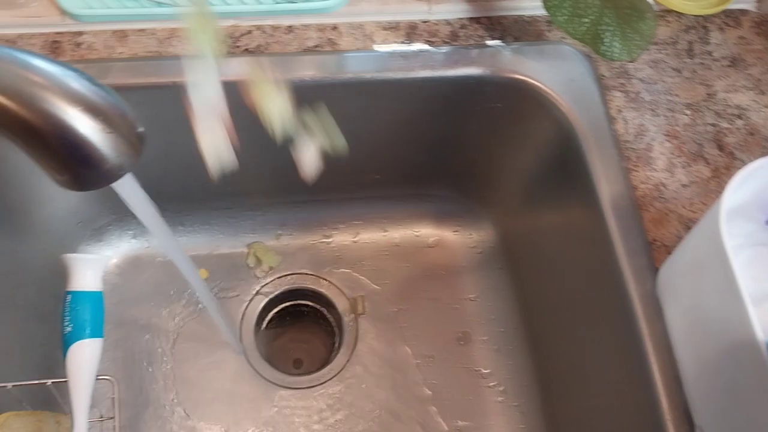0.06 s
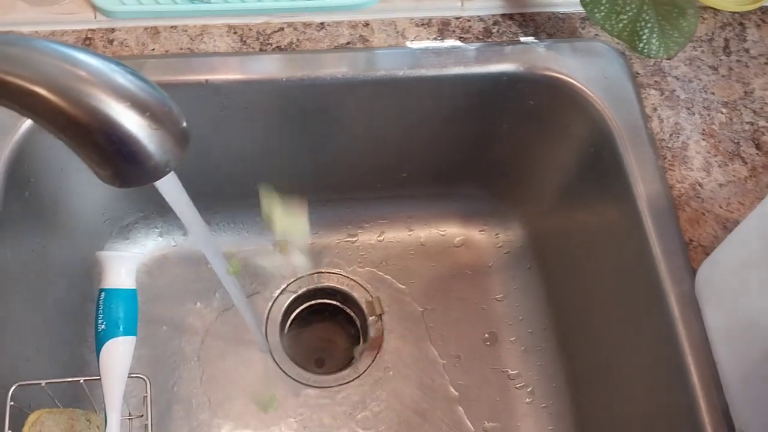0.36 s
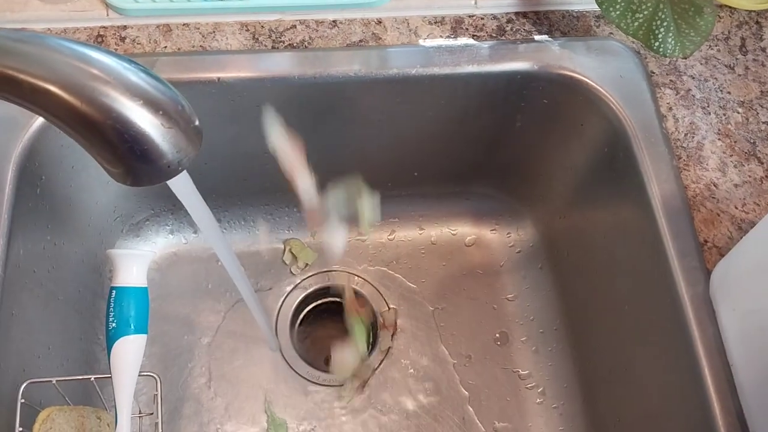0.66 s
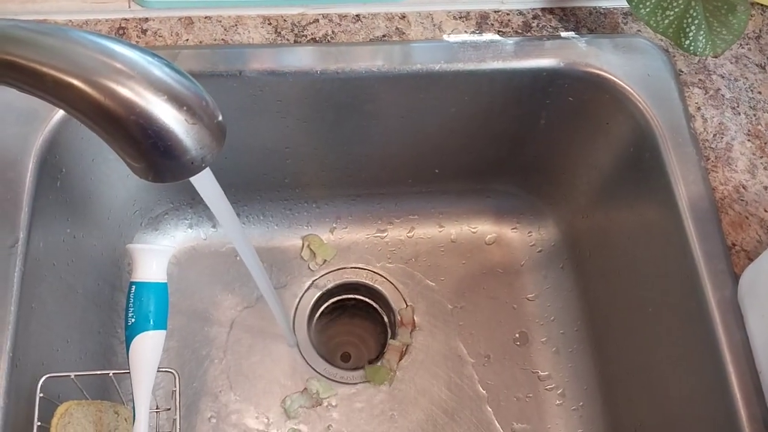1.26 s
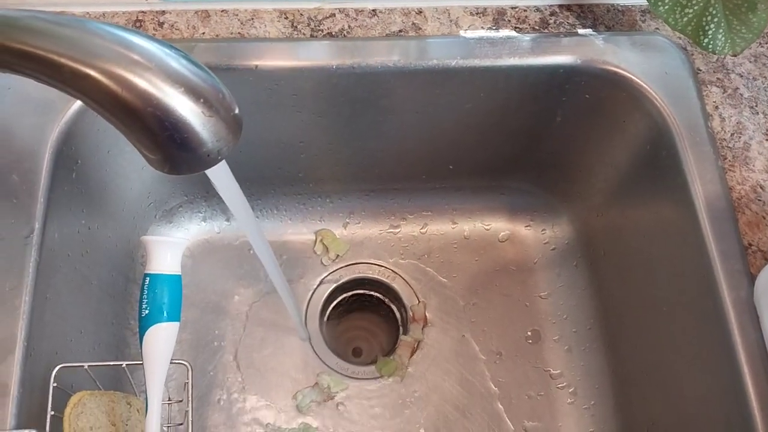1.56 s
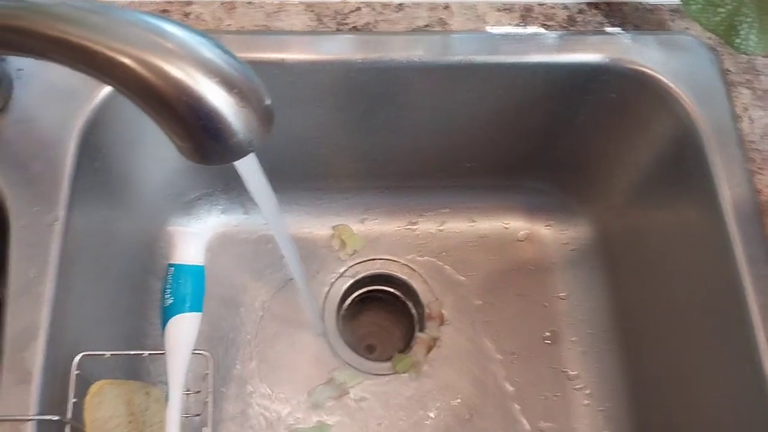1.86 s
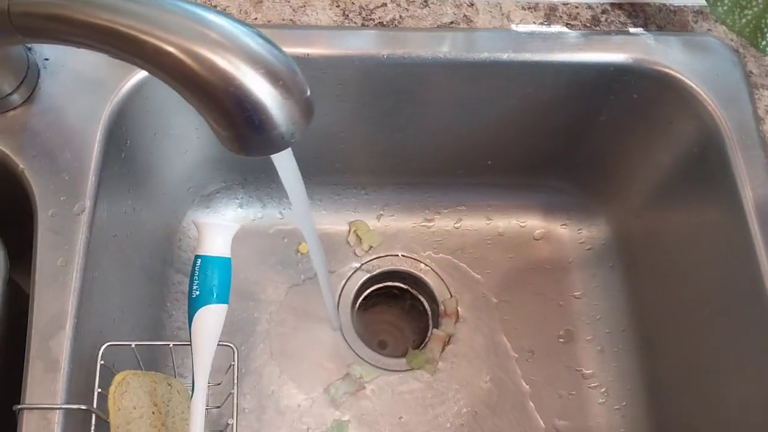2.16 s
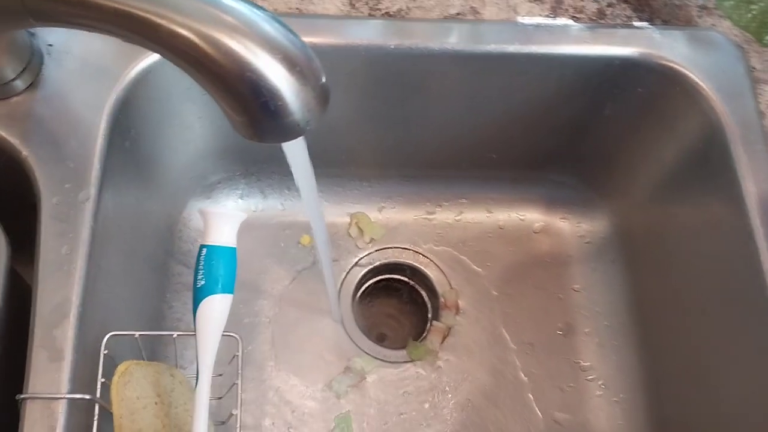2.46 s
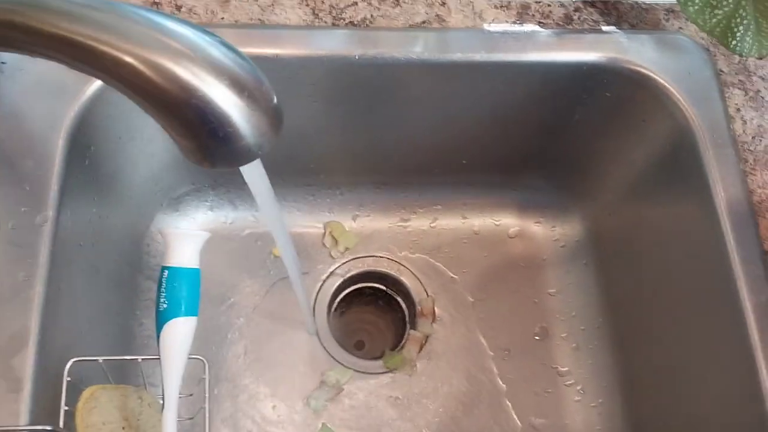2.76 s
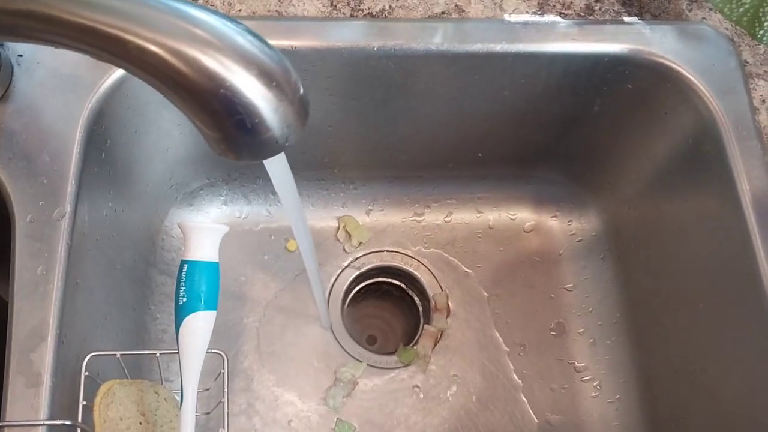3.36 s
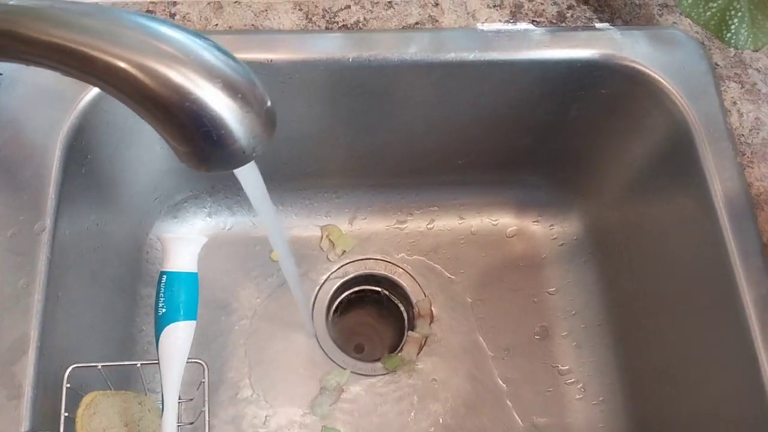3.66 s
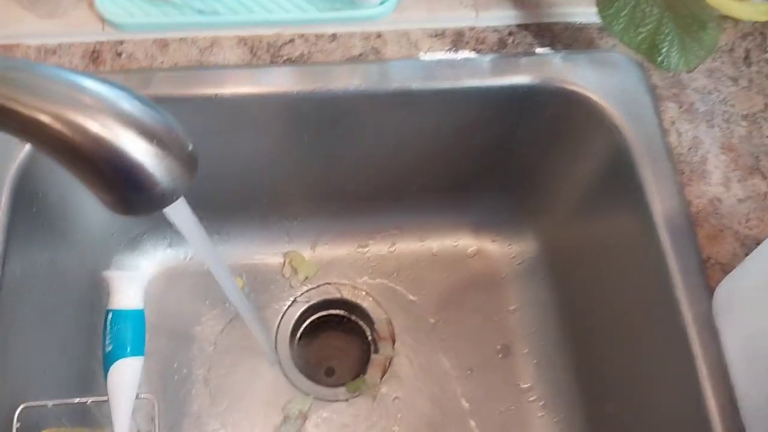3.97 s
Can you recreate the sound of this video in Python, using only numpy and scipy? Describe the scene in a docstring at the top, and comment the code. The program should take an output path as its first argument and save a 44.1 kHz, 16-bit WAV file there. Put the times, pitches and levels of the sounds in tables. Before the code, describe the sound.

A garbage disposal runs in a steel kitchen sink, its motor humming and whining while food scraps rattle and crunch inside. Tap water splashes into the basin throughout, over a low churning rumble.

```python
"""At a steel kitchen sink, a garbage disposal runs while the tap pours into the basin.
The splashing tap makes a hiss, and water churning in the disposal's chamber makes a low rumble.
The motor hums and whines at multiples of its shaft speed. Food scraps rattle against the
grind ring, hardest twice a turn, and make the sink ring."""
import sys
import numpy as np
from scipy import signal
from scipy.fft import rfft, irfft, next_fast_len
from scipy.io import wavfile
from scipy.ndimage import uniform_filter1d, map_coordinates

SR = 44100
rng = np.random.default_rng(int(sys.argv[2]) if len(sys.argv) > 2 else 0)


def file_out(sig):
    """Save sig as 16-bit WAV at sys.argv[1]."""
    # one column per channel
    cols = np.atleast_2d(sig).T
    # limit, then scale
    lim = np.clip(cols, -1, 1)
    pcm = np.round(lim * 32767).astype(np.int16)
    wavfile.write(sys.argv[1], SR, pcm)


N = 176400  # 4 seconds

# how alike left and right sound (1 same, 0 unrelated, -1 opposite): pitch_hz, likeness
STEREO_LIKENESS = [(60, .98), (450, .975), (650, .5), (900, .6), (1300, .15), (1550, .7), (1850, .25),
                   (2100, .7), (2400, .35), (2650, -.35), (3000, .3), (3350, -.45), (3680, -.7),
                   (3950, .15), (4300, -.2), (5000, 0)]
# pitches at which the steel sink rings: pitch_hz, width_hz, level_db
SINK_RINGS = [(878, 50, -4), (1087, 19.5, 6), (1190, 16, 3), (1397, 33, 6), (1550, 89, -8.5),
              (1682, 25, -1.5), (1956, 43, -4.5), (2207, 50, 1), (2437, 74, 3.5), (2950, 310, 0),
              (3950, 260, -4.5), (5060, 330, -3)]
# how the basin colours rattle and splash on each side: pitch_hz, left_db, right_db
BASIN_COLOUR = [(580, -33, -13), (630, -25, -25), (790, -17.5, -24.5), (837, -15, -12.5), (1094, -13, -13),
                (1160, -18.5, -14), (1377, -16.3, -11), (1800, -8, -7.5), (1910, -9.5, -9),
                (2250, -15, -4.5), (2240, -20.5, -3.5), (2760, -11, -11.5), (3190, -20, -8.5),
                (3340, -6, -5), (3980, -16.5, -7), (4430, -8.5, -10.5), (4500, -17.5, -11),
                (4730, -13, -11.5), (5600, -13.5, -10.5), (7620, -14, -10.5), (8500, -20.5, -21),
                (9550, -18.5, -14.5), (10640, -16.5, -9.5), (12900, -11.5, -8.5), (14200, -14.5, -13.5),
                (16100, -17, -13)]
# strength of the tap stream on the steel: time_s, level_db
TAP_FLOW = [(0, -21), (.3, -21.5), (1.1, -21.5), (2.1, -21), (3.5, -20.5), (4, -21)]
# balance of low and high in the splash: pitch_hz, gain_db
TAP_COLOUR = [(300, -49), (700, -10.5), (2000, -8.5), (4000, -5.5), (6000, 0), (9000, 1), (15000, -2.5)]
# spurts of spray: start_s, level_db
TAP_SPURTS = [(.079, -15.5), (.345, -17), (.62, -18), (.743, -20), (.878, -21), (1.071, -20), (1.44, -16),
              (1.859, -17)]
# balance of low and high in the churning water: pitch_hz, gain_db
CHURN_COLOUR = [(20, -35), (36, -33), (52, -17), (66, -21), (110, -18.5), (148, -3.5), (172, -16.5),
                (215, -0.5), (240, 0.5), (258, -3), (275, -3), (300, -2.5), (350, -1), (400, 1.5),
                (435, -4.5), (470, -8.5), (505, -22.5), (620, -32.5), (900, -70)]
# gulps of the churning water: peak_s, level_db
CHURN_GULPS = [(.27, -21.5), (.335, -21), (1.705, -22), (2.15, -25), (2.612, -21)]
# shaft speed under a changing load: time_s, turns_per_s
SHAFT_SPEED = [(0, 67.85), (0.2, 67.61), (0.35, 68.06), (0.55, 67.68), (0.88, 67.95), (1.1, 67.26),
               (1.35, 67.22), (1.65, 67.51), (2, 67.53), (2.2, 67.27), (2.4, 67.74), (2.75, 67.95),
               (2.95, 67.79), (3.25, 68.09), (3.5, 68.15), (4, 67.28)]
# tones in the motor's hum: cycles_per_turn, level_db, roughness
HUM_TONES = [(1, -38, 0), (2, -34, 0), (3, -38, 0.53), (4, -38.5, 1), (5, -39.5, 0), (8, -53, .6),
             (16, -61, 1), (18, -58, 0.5), (23, -47, 0)]
# buzz of the mains electricity: pitch_hz, level_db
MAINS_TONES = [(120, -42.5), (240, -41.5)]
# drone of the chamber: time_s, level_db
DRONE_LEVEL = [(0, -32), (.55, -25), (.73, -25.5), (.82, -25), (1.3, -26), (1.75, -25.5), (2.05, -30.5),
               (2.17, -27.5), (2.33, -33.5), (2.4, -28.5), (3.05, -31.5), (3.3, -25.5), (3.42, -32),
               (3.62, -26.5), (4, -29.5)]
# whine of the grind plate: time_s, level_db
WHINE_LEVEL = [(0, -35), (.9, -34.5), (1.2, -32), (2.6, -30.5), (3.25, -34), (3.7, -36), (4, -46)]
# scraps that scrape and ring: peak_s, pitch_hz, level_db, width_s
RING_SCRAPES = [(0.455, 2920, -31, 0.055), (0.619, 2960, -29, 0.017), (1.606, 3900, -31.5, 0.086),
                (2.137, 2420, -24, .007), (2.223, 2350, -29.5, 0.016), (3.234, 2060, -31, 0.012)]
# how hard the steady grinding works: time_s, level_db
GRIND_EFFORT = [(0, -20.5), (.25, -24), (1.1, -24), (2.2, -23), (3.2, -24), (4, -24.5)]
# balance of low and high in the rattle: pitch_hz, gain_db
GRIND_COLOUR = [(300, -36), (550, -1.5), (900, -1.5), (4000, 1), (6000, -3), (9000, -8.5), (15000, -35)]
# how much the rattle's treble gains and its middle loses: time_s, shift_db
GRIND_BRIGHTNESS = [(0, 4.5), (.7, 3), (1.4, 1.3), (2, 1), (3, 1), (4, 0)]
# larger scraps caught by the plate: start_s, level_db
BIG_CRUNCHES = [(.053, -20), (.148, -19.5), (.456, -18.5), (.495, -19), (.553, -27), (.746, -16),
                (.967, -15.5), (1.056, -19.5), (1.071, -14), (1.232, -31), (1.53, -22), (1.66, -15.5),
                (1.76, -21), (1.94, -21), (2.138, -23), (2.316, -15), (2.377, -21), (2.525, -21),
                (2.789, -16), (2.963, -14.5), (3.216, -29), (3.23, -14), (3.252, -20), (3.495, -19),
                (3.612, -18), (3.828, -16.5)]
# lulls when the plate runs free: middle_s
GRIND_LULLS = [.72, .785, 1.495, 3.29, 3.655]

CRUNCH_FADE_S = .075  # time for a crunch or a bite to fall by 60 dB


def amp(db):
    """Turn decibels into a number to multiply by."""
    return 10 ** (np.asarray(db) / 20)


def unit(x):
    """Scale a signal to an average strength (rms) of 1."""
    return x / np.sqrt(np.mean(x ** 2) + 1e-20)


def along(points, hz):
    """Read between (pitch_hz, value) points, with octaves about evenly spaced."""
    pitches, values = np.transpose(points)
    return np.interp(np.log(hz + 1), np.log(pitches + 1), values)


def curve(rows):
    """Join (time_s, value) points with straight lines, one value per sample."""
    return np.interp(np.arange(N) / SR, *np.transpose(rows))


def wobble(rate):
    """A smooth curve through `rate` random values a second."""
    return map_coordinates(rng.standard_normal(2048), [np.arange(N) * rate / SR], mode="wrap")


def filtered(x, response):
    """Turn each pitch in x up or down by the gain response(hz)."""
    size = next_fast_len(N + SR // 2)
    return irfft(rfft(x, size) * response(np.fft.rfftfreq(size, 1 / SR)), size)[..., :N]


def spread(pair):
    """Mix two unrelated signals into a left and a right that are partly alike."""
    angle = lambda hz: np.arccos(np.clip(along(STEREO_LIKENESS, hz), -1, 1)) / 2
    mid, side = filtered(pair, lambda hz: np.array([np.cos(angle(hz)), np.sin(angle(hz))]))
    return np.array([mid + side, mid - side])


def tone(cycles, rough, rate):
    """A tone that flutters in strength and pitch; rough = 0 keeps it pure."""
    flutter = 1 + rough * (wobble(rate) + 1j * wobble(rate))
    return unit((flutter * np.exp(2j * np.pi * cycles)).real)


def impacts(per_s, spread_db):
    """Two unrelated showers of tiny blows of uneven size."""
    hit = rng.random((2, N)) < per_s / SR
    sign, size = rng.standard_normal((2, 2, N))
    return unit(hit * np.sign(sign) * amp(spread_db * size))


def bursts(rows, fade_s, rise_s):
    """Power over time of events that rise fast, then fall by 60 dB in fade_s."""
    t, power = np.arange(SR // 4) / SR, np.zeros(N + SR)
    shape = (1 - np.exp(-t / rise_s)) * np.exp(-np.log(1000) * t / fade_s)
    for start_s, db in rows:
        power[round(start_s * SR):][:len(t)] += (amp(db) * shape) ** 2
    return power[:N]


def basin(blows, colour):
    """Blows ring the steel sink, which changes their tone but keeps their overall level."""
    def response(hz):
        rings = sum(amp(db) * 1j * hz * width / (pitch * pitch - hz * hz + 1j * hz * width)
                    for pitch, width, db in SINK_RINGS)
        left_db = along([(pitch, db) for pitch, db, _ in BASIN_COLOUR], hz)
        right_db = along([(pitch, db) for pitch, _, db in BASIN_COLOUR], hz)
        return (1 + amp(-1) * rings) * amp([left_db, right_db]) * amp(along(colour, hz))
    return unit(filtered(spread(blows), response)) * np.std(blows)


def patchy(x, depth_db):
    """Different scraps and drops favour different pitches, so the tone keeps shifting."""
    spectrum = signal.stft(x, nperseg=512)[2]
    patches = uniform_filter1d(rng.standard_normal(spectrum.shape[1:]), size=4, axis=0)  # over pitch
    patches = uniform_filter1d(patches, size=14, axis=1)  # over time
    shifted = signal.istft(spectrum * amp(depth_db * unit(patches)), nperseg=512)[1]
    return unit(shifted[:, :N]) * np.std(x)


def tap(turns):
    """The stream breaks into tiny drops on steel shaken by the motor, now and then with a spurt."""
    shake_db = 0.28 * (np.cos(2 * np.pi * turns) + np.cos(4 * np.pi * turns))
    flow = amp(curve(TAP_FLOW) + 0.5 * wobble(55) + 0.92 * wobble(300) + shake_db)
    force = np.sqrt(flow ** 2 + bursts(TAP_SPURTS, fade_s=.07, rise_s=0.00053))
    drops = force * impacts(per_s=14000, spread_db=2.5)
    return patchy(basin(drops, TAP_COLOUR), depth_db=1.2)


def churn(level_db=-27, swing_db=1.56, gulp_s=.009):
    """Water thrown round the chamber makes a low, lumpy rumble with a few gulps."""
    t = np.arange(N) / SR
    noise = spread(rng.standard_normal((2, N)))
    water = unit(filtered(noise, lambda hz: amp(along(CHURN_COLOUR, hz))))
    gulps = sum(amp(db) ** 2 * np.exp(-((t - peak_s) / gulp_s) ** 2) for peak_s, db in CHURN_GULPS)
    return water * np.sqrt(amp(level_db + swing_db * wobble(22.1)) ** 2 + gulps)


def motor(turns):
    """The shaft's hum, chamber's drone and plate's whine follow the speed; the mains buzz is steady."""
    t = np.arange(N) / SR
    hum = sum(amp(db) * tone(per_turn * turns + rng.random(), rough, rate=16)
              for per_turn, db, rough in HUM_TONES)
    buzz = sum(amp(db) * unit(np.sin(2 * np.pi * (hz * t + rng.random()))) for hz, db in MAINS_TONES)
    drone = amp(curve(DRONE_LEVEL)) * tone(6 * turns, rough=0.46, rate=24)
    whine = amp(curve(WHINE_LEVEL)) * tone(30 * turns, rough=0.61, rate=60)
    return hum + buzz + drone + whine * amp([[-4], [4]])  # the whine sits to the right


def scrapes(flutter_hz=220):
    """A scrap dragged along the ring makes one rough note swell and fade."""
    t, sound = np.arange(N) / SR, np.zeros(N)
    for peak_s, hz, db, width_s in RING_SCRAPES:
        flutter = wobble(flutter_hz) + 1j * wobble(flutter_hz)
        note = unit((flutter * np.exp(2j * np.pi * hz * t)).real)
        swell = np.exp(-((t - peak_s) / width_s) ** 2 / 2)
        sound += amp(db) * swell * note
    return sound * amp([[-5.5], [5.5]])  # to the right


def bites(per_s=50, level_db=-6):
    """Small scraps catch at random: short jumps in power, relative to the steady grinding."""
    starts = rng.random(N) < per_s / SR
    decay = np.exp(-2 * np.log(1000) / (CRUNCH_FADE_S * SR))
    return signal.lfilter([amp(level_db) ** 2], [1, -decay], starts)


def grind(turns, lull_s=.018, lull_db=-5, treble_hz=3500):
    """Scraps hit the ring, hardest as the plate's two lugs (bumps) pass, and dull as they soften."""
    t, angle = np.arange(N) / SR, 2 * np.pi * turns
    lugs = unit(amp(0.8 * np.cos(angle) + 1.24 * np.cos(2 * angle) + 1.86 * wobble(260)))
    lulls = sum(np.exp(-((t - middle_s) / lull_s) ** 2) for middle_s in GRIND_LULLS)
    load = amp(curve(GRIND_EFFORT) + 0.5 * wobble(44) + lull_db * lulls)
    crunches = bursts(BIG_CRUNCHES, CRUNCH_FADE_S, rise_s=0.00019)
    force = lugs * np.sqrt(load ** 2 * (1 + bites()) + crunches)
    blows = force * impacts(per_s=6000, spread_db=2.8)
    rattle = patchy(basin(blows, GRIND_COLOUR), depth_db=1.5)
    middle = filtered(rattle, lambda hz: 1 / (1 + (hz / treble_hz) ** 4))
    treble = rattle - middle
    bright_db = curve(GRIND_BRIGHTNESS)
    return middle * amp(-bright_db) + treble * amp(bright_db)


def scene():
    """One shaft drives the hum, whine and grinding; the water runs the whole time."""
    turns = np.cumsum(curve(SHAFT_SPEED)) / SR  # turns made so far
    return motor(turns) + churn() + grind(turns) + scrapes() + tap(turns)


def record(dry, top_hz=15750):
    """Cut off the very highest pitches."""
    return filtered(dry, lambda hz: hz < top_hz)


dry = scene()
out = record(dry)
file_out(out)
```